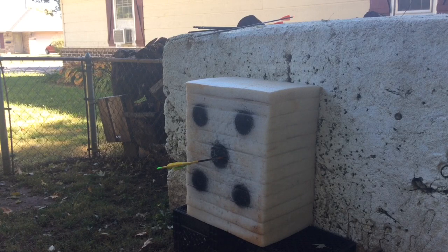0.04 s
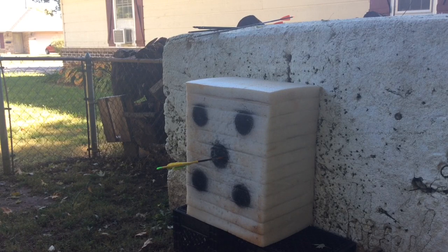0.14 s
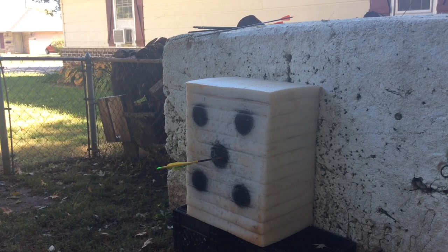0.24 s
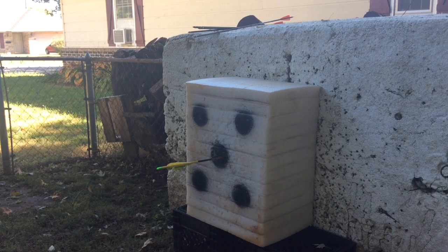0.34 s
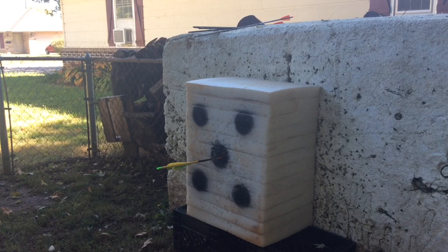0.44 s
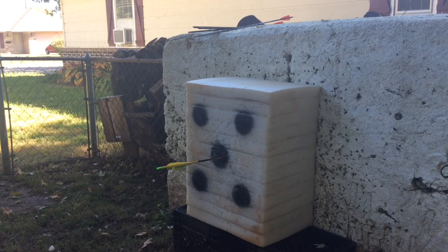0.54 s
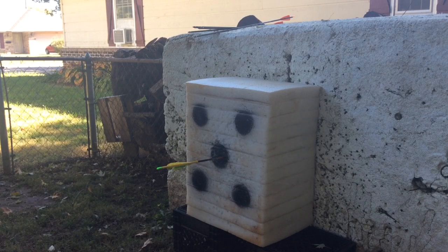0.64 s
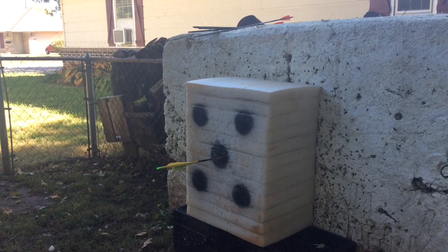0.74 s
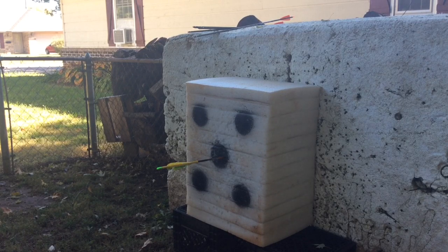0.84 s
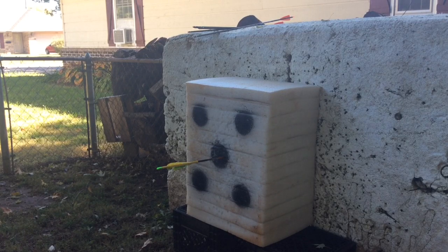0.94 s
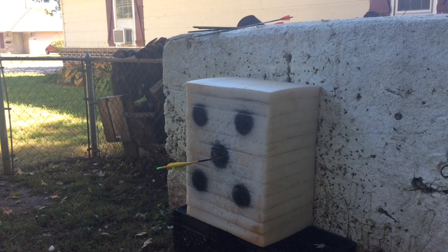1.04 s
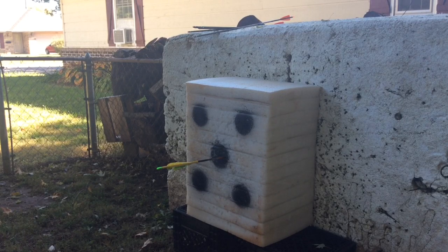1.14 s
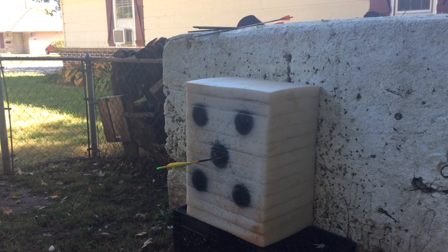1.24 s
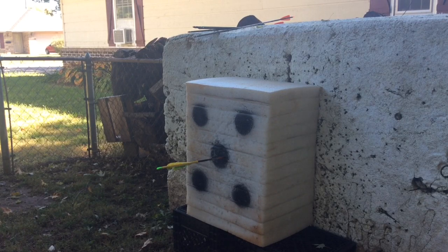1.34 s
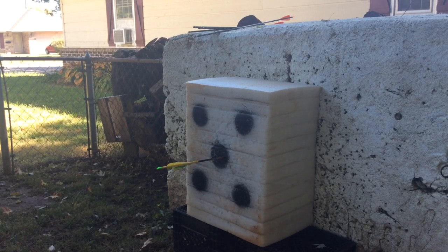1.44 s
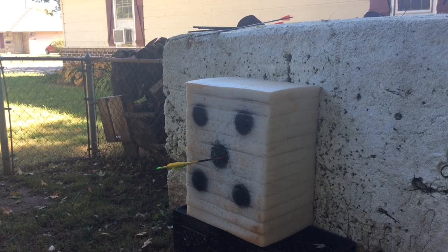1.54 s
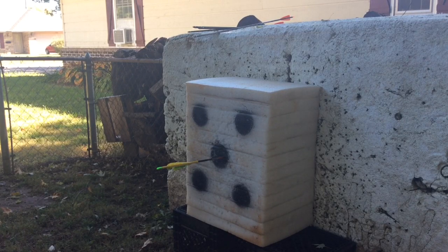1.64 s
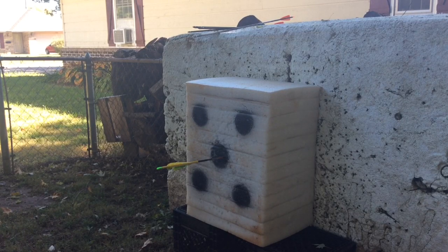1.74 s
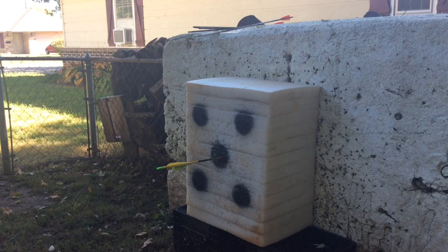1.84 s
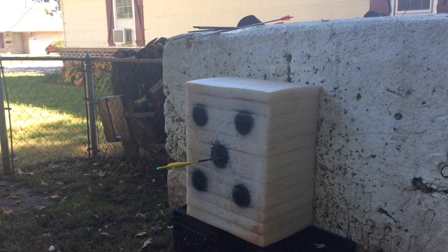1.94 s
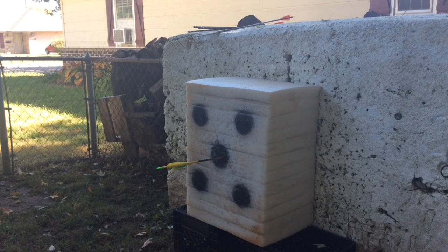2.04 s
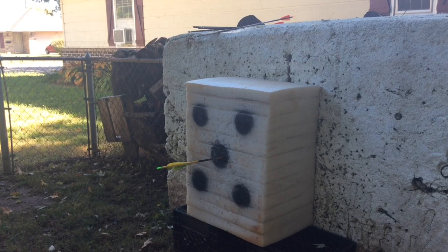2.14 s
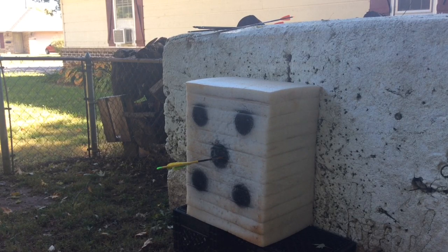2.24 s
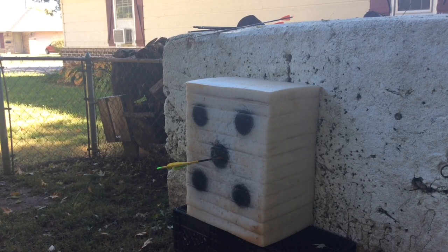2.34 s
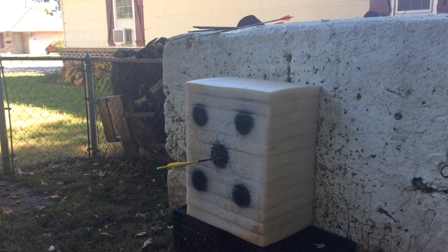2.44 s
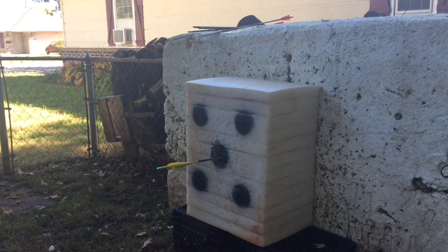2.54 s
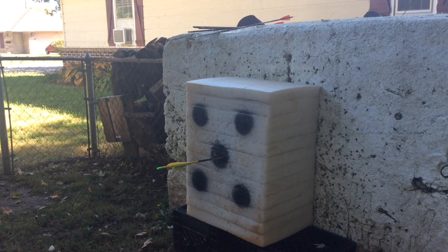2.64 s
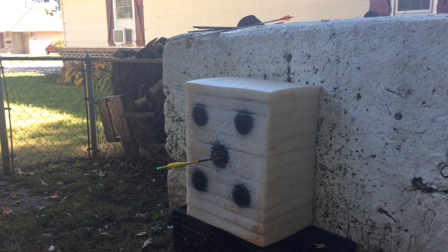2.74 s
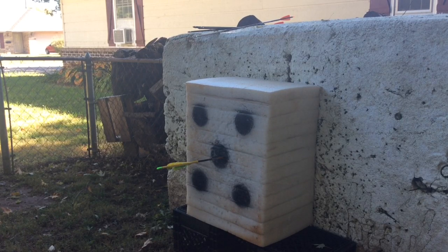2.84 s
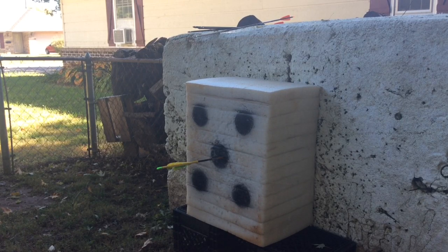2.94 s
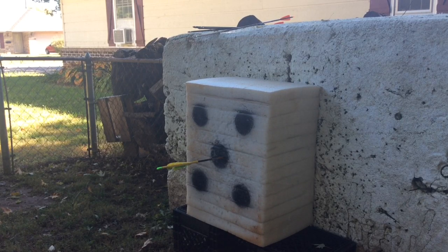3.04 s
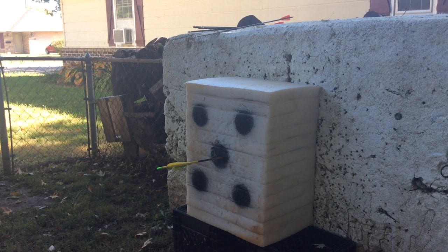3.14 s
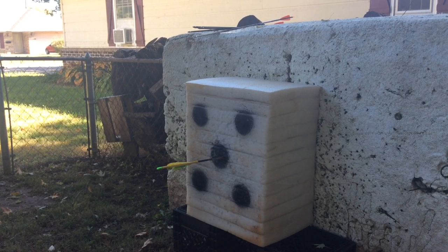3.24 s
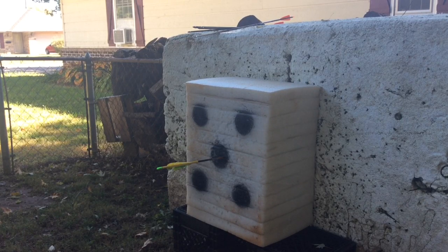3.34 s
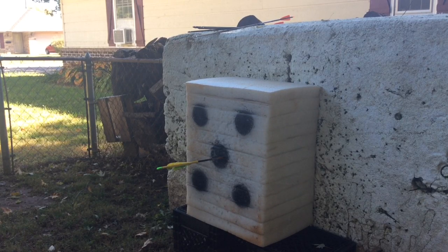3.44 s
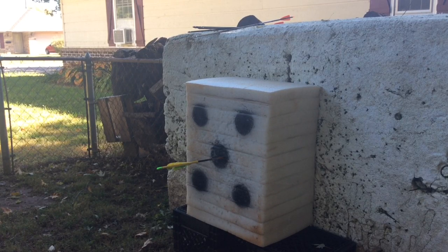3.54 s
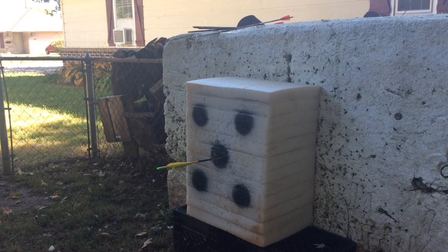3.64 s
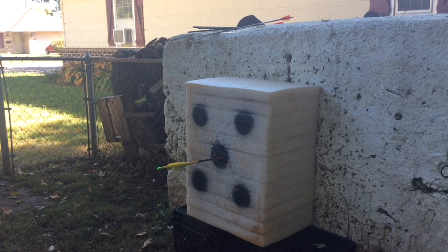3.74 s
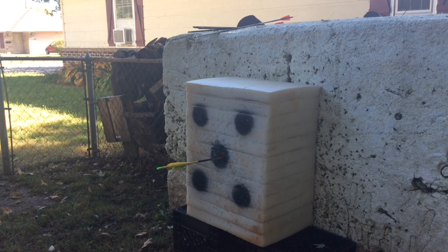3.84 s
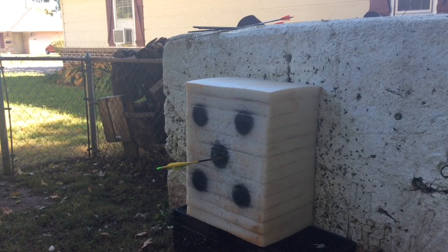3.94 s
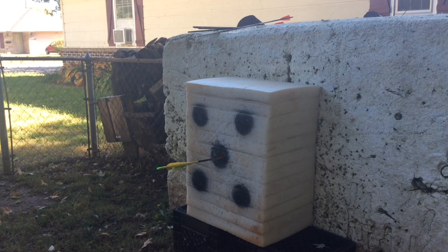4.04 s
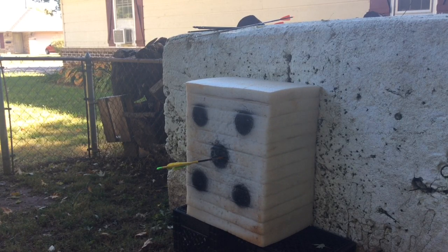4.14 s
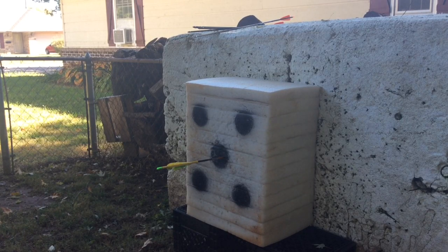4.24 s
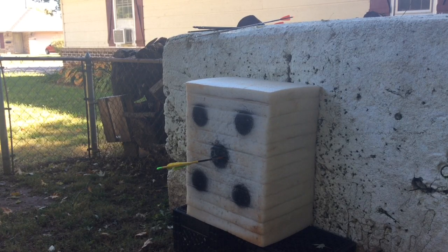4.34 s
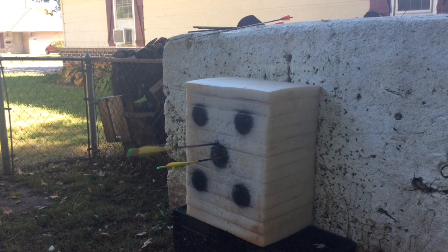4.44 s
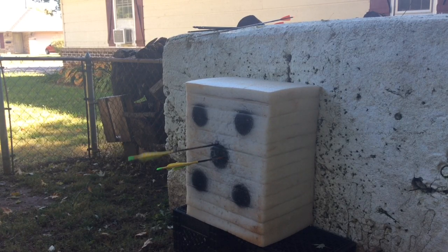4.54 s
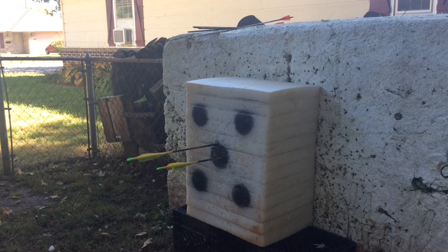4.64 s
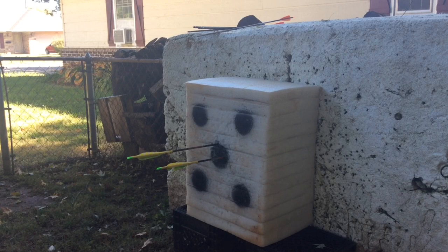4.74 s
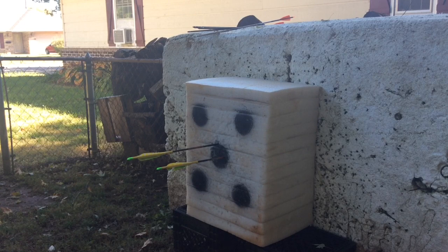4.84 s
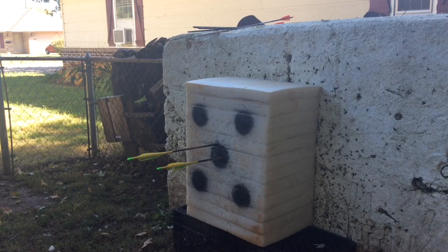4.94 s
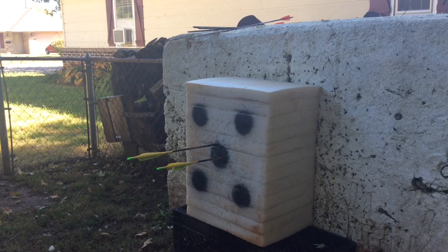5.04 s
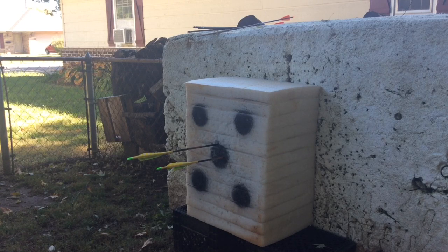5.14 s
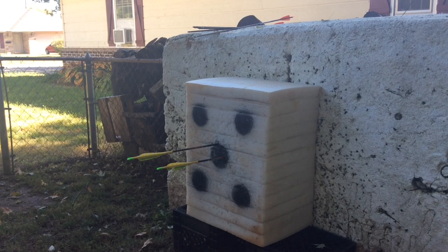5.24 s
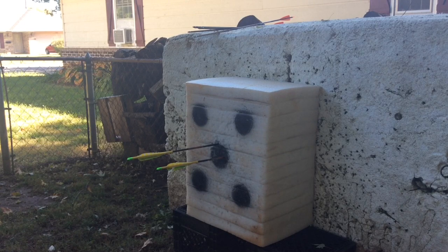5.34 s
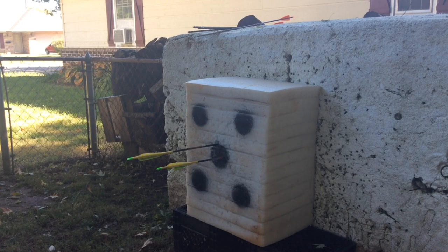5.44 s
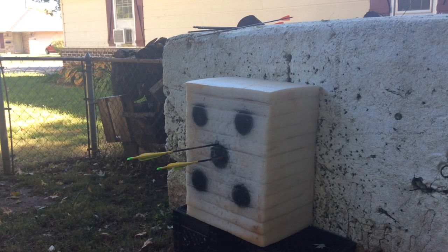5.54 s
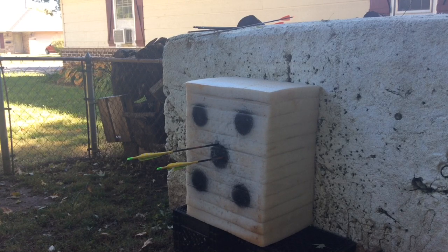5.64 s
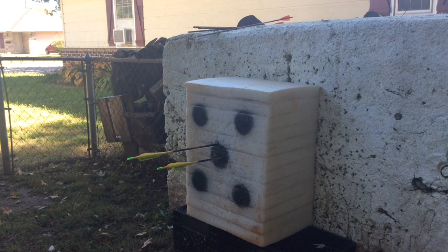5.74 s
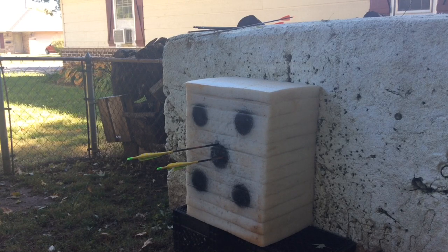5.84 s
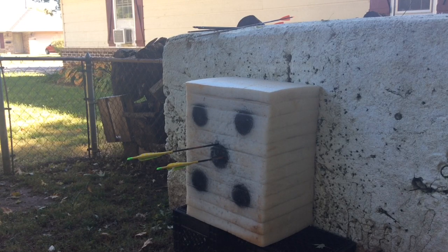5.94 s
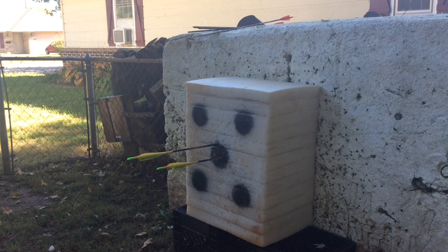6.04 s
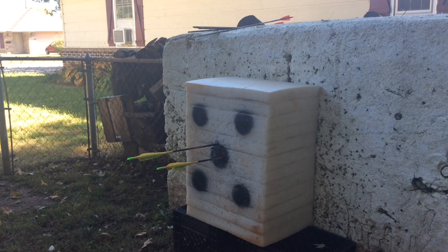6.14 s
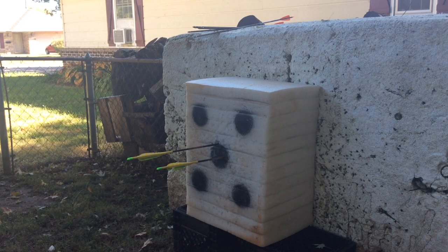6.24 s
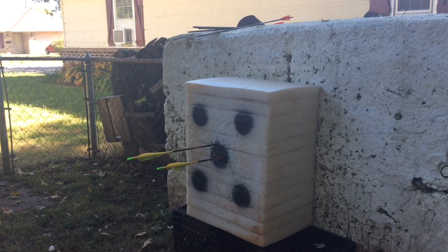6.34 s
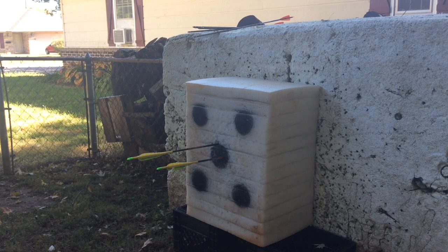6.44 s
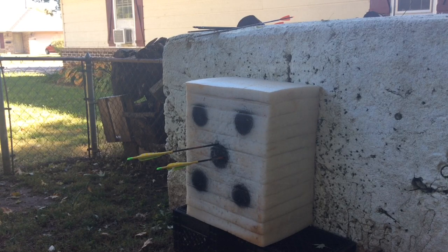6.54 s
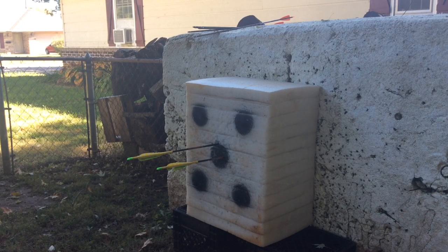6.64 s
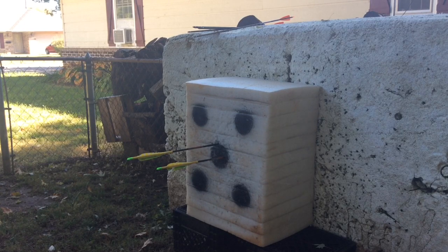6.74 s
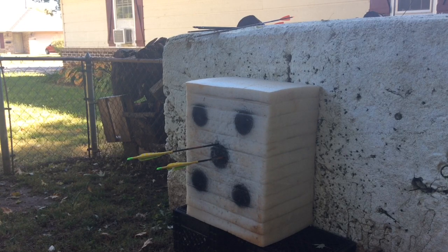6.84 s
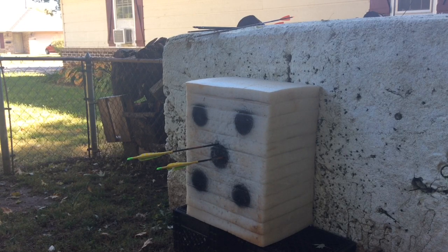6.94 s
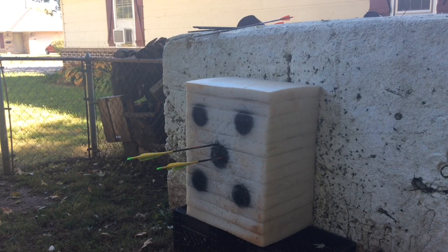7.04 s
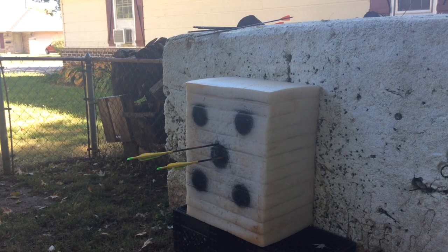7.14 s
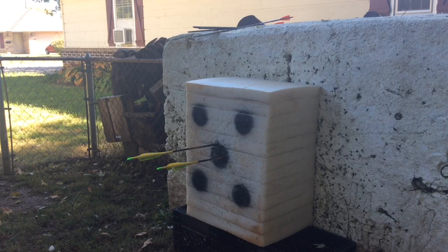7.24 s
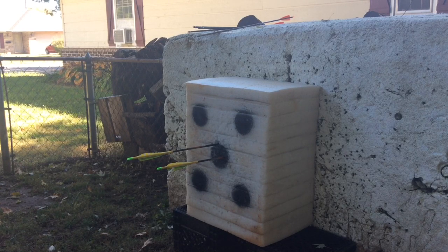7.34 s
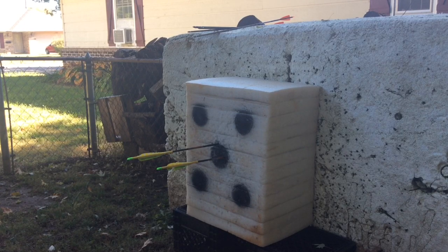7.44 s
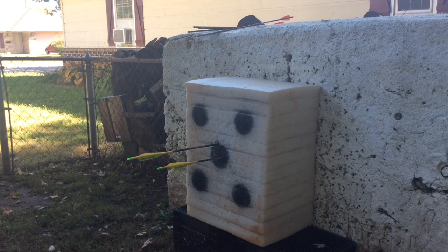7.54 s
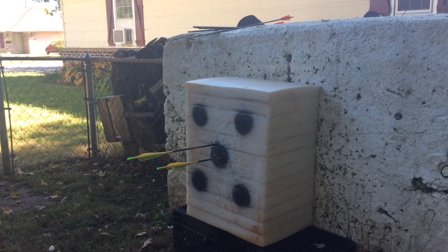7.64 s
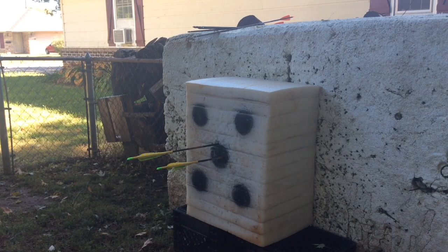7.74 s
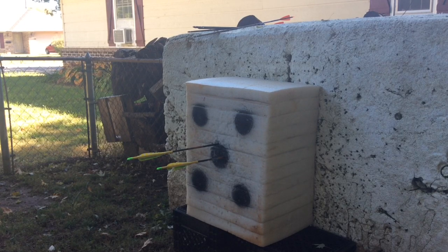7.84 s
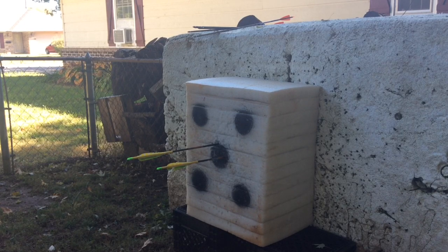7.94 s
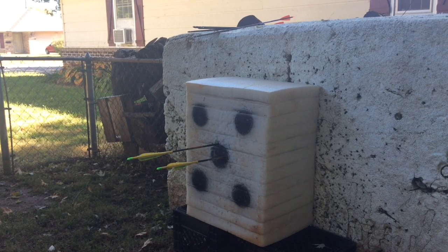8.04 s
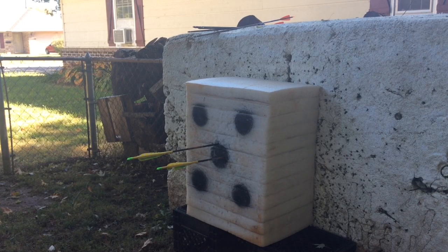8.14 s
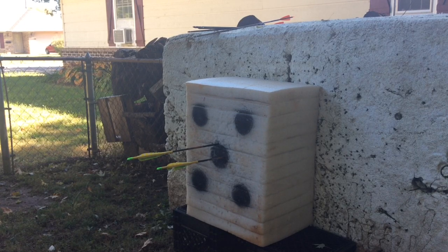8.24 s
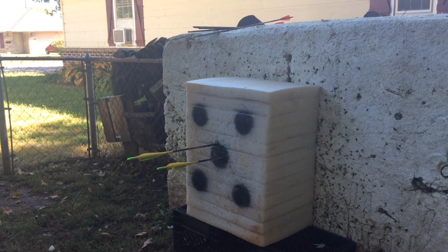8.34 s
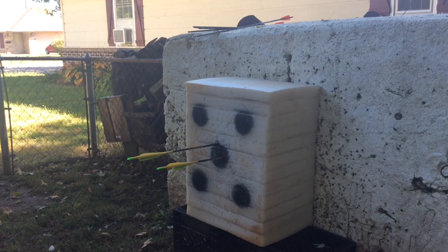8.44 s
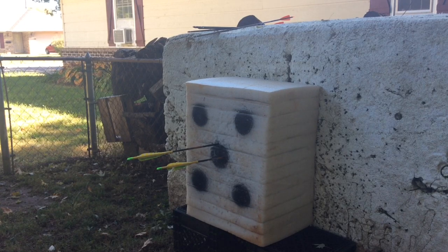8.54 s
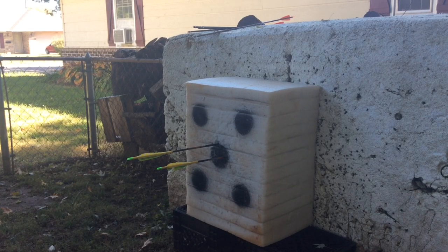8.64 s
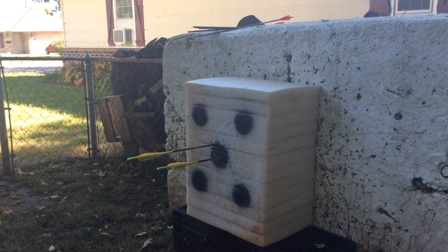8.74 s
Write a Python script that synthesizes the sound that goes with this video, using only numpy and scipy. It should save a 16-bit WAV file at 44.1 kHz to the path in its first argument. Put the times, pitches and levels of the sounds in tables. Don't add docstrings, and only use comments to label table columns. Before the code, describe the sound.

Soft town rumble and thin cricket trills, then a bow's distant snap, a quick hiss and one loud overloaded arrow thwack.

```python
import sys
import numpy as np
from scipy import signal
from scipy.io import wavfile
from scipy.ndimage import uniform_filter1d

SR = 44100
rng = np.random.default_rng(int(sys.argv[2]) if len(sys.argv) > 2 else 0)


def elevation(decibels):
    levels = np.asarray(decibels, float)
    return 10 ** (levels / 20)


def digitize_waveform(pressure):
    field = np.atleast_2d(pressure).T
    bounded = np.clip(field, -1, 1)
    quanta = np.round(bounded * 32767).astype(np.int16)
    wavfile.write(sys.argv[1], SR, quanta)


N = 387633
T = np.arange(N) / SR


def band(x, hz, width_hz, order=1):
    edges = np.clip([hz - width_hz / 2, hz + width_hz / 2], 10, .45 * SR)
    return signal.sosfilt(signal.butter(order, edges, "bandpass", fs=SR, output="sos"), x)


def unit(x):
    return x / np.sqrt(np.mean(x ** 2))


def noise_band(hz, width_hz, order=1):
    return unit(band(rng.standard_normal(N), hz, width_hz, order))


def walk(rate):
    hold = int(SR / rate)
    held = rng.standard_normal(N // 64)[np.arange(N) // hold]
    return 1.3 * uniform_filter1d(uniform_filter1d(held, hold), hold)


def struck(modes, blows):
    t = T[:SR // 2]
    ring = 0
    for k, (hz, db, t60) in enumerate(modes):
        ring = ring + (-1) ** (k + 1) * elevation(db) * np.sin(2 * np.pi * hz * t) * 1000. ** (-t / t60)
    force = np.zeros(N)
    for s, db, contact in blows:
        contact = max(contact, 2 / SR)
        push = np.sin(np.pi * np.clip((T - s) / contact, 0, 1))
        force += elevation(db) * push * np.pi / (2 * contact * SR)
    return signal.fftconvolve(force, ring)[:N]


# mode_hz, level_db, t60_s
SHAFT_MODES = [(613, -17, 0.045), (1040, -6, 0.019), (1290, -14.5, 0.012), (1660, -17, 0.03),
               (2080, -13.5, 0.015), (2720, -10.5, 0.011), (3220, -9.5, 0.0067), (4305, -4.5, 0.013),
               (5700, -8, 0.0043), (7430, -9.5, 0.0079), (8960, -16, 0.011), (11100, -10, 0.0059),
               (14000, -10, 0.0087)]
# mode_hz, level_db, t60_s
FOAM_MODES = [(128.6, -19, 0.163), (160.8, -1.5, 0.17), (216, -2, 0.043), (297, -5, 0.044),
              (428, 4.5, 0.027), (553, -1.5, 0.035), (689, 1.5, 0.036)]
# start_s, level_db, contact_s
TIP_BLOWS = [
    (4.5307, -0.5, 0.000058),
    (4.5328, 4.5, 0.00014),
    (4.544, -1, 0.00024),
]
# start_s, level_db, contact_s
FOAM_BLOWS = [
    (4.5346, 1.54, .0015),
    (4.5385, 1.7, 0.0016),
    (4.5424, 1, 0.00082),
]


def impact():
    return struck(SHAFT_MODES, TIP_BLOWS) + struck(FOAM_MODES, FOAM_BLOWS)


# delay_s, level_db, centre_hz, width_hz
ECHOES = [
    (0.037, -32, 4700, 1300),
    (0.054, -31, 4500, 1000),
    (0.038, -19.5, 240, 80),
    (0.053, -16.5, 153, 110),
    (.17, -23.5, 182, 53),
    (.167, -49, 2000, 1400),
    (0.17, -37.5, 2000, 1300),
    (0.25, -43, 180, 53),
]


def echoes(hit):
    out = np.zeros(N)
    for delay, db, hz, width_hz in ECHOES:
        out += elevation(db) * np.interp(T - delay, T, band(hit, hz, width_hz, order=2))
    return out


# band_hz, start_level_db, t60_s
TAIL = [(59.5, -33, 0.37), (132, -27.5, 0.44), (343, -15, 0.14), (890, -27, 0.092), (2200, -26.5, 0.077),
        (4500, -27.5, 0.093), (9000, -39, 0.12), (13000, -38, 0.089)]


def scattered_tail():
    out = np.zeros(N)
    since = np.clip(T - TIP_BLOWS[0][0], 0, None)
    for hz, db, t60 in TAIL:
        patchy = elevation(db) * elevation(3.5 * walk(150))
        decay = 1000. ** (-since / t60) * (since > 0)
        out += patchy * noise_band(hz, hz * 0.41) * decay
    return out


def thwack():
    hit = impact()
    return hit + echoes(hit) + scattered_tail()


# mode_hz, level_db, t60_s
LIMB_MODES = [(110, -1, 0.15), (136, -10, .12), (170, -11, 0.16), (250, -1.5, 0.0447), (520, -7, 0.038)]
# mode_hz, level_db, t60_s
RISER_MODES = [(2450, -4, 0.057), (2662, 2.5, 0.085), (4150, 5.5, 0.015)]
# start_s, level_db, contact_s
LIMB_BLOWS = [
    (4.392, -20, 0.0032),
    (4.398, -20, 0.0028),
    (4.412, -19.5, 0.0036),
]
# start_s, level_db, contact_s
RISER_BLOWS = [
    (4.383, -52, .0003),
    (4.398, -33, .0001),
    (4.408, -30, .0001),
]


def bow():
    return struck(LIMB_MODES, LIMB_BLOWS) + struck(RISER_MODES, RISER_BLOWS)


def air_noise():
    dull = noise_band(3200, 6200)
    sharp = noise_band(10000, 7100)

    def mix(sharp_share):
        dull_part = np.sqrt(np.clip(1 - sharp_share, 0, 1)) * dull
        return dull_part + np.sqrt(np.clip(sharp_share, 0, 1)) * sharp
    return mix


def string_snap(mix):
    SNAP_S, RISE_S = 4.404, 0.017
    since = T - SNAP_S
    rise = np.clip(1 + since / RISE_S, 0, 1) ** 2

    def swing(fall_s):
        return rise * np.exp(-np.clip(since, 0, None) / fall_s)
    snap = elevation(-28) * swing(0.0086) * mix(0.38)
    ringing_yard = elevation(-39) * swing(0.036) * mix(0.11)
    return snap + ringing_yard


def arrow_flight(mix):
    LEAVES_S, LANDS_S = 4.392, 4.531
    SPEED_M_S, ASIDE_M = 44, 1.3
    FEATHER_DB, HUM_DB = -35, -33
    HUM_HZ, HUM_FADE_S = 432, .3
    ahead_m = SPEED_M_S * np.clip(LANDS_S - T, 0, LANDS_S - LEAVES_S)
    distance_m = np.hypot(ahead_m, ASIDE_M)
    facing = ahead_m / distance_m
    heard_hz = HUM_HZ / (1 - SPEED_M_S * facing / 343)
    phase = 2 * np.pi * np.cumsum(heard_hz * (1 + .01 * walk(90))) / SR
    hum = elevation(-3 + 3.5 * walk(70)) * np.sin(phase)
    hum = hum + elevation(-10 + 4.0 * walk(70)) * np.sin(1.65 * phase)
    hum = elevation(HUM_DB) * hum * np.exp(-np.clip(T - LEAVES_S, 0, 1) / HUM_FADE_S)
    hiss = elevation(FEATHER_DB) * mix(0.32 + .5 * facing)
    flying = (T > LEAVES_S) * (T < LANDS_S) / distance_m
    return flying * (hiss + hum)


def flight():
    mix = air_noise()
    return string_snap(mix) + arrow_flight(mix)


def cricket(trills, strokes, duty, third_db, blur, sag, swell):
    turns = np.cumsum(strokes * (1 + .08 * walk(12))) / SR
    stroke = np.clip(turns % 1 / duty, 0, 1)
    size, detune = rng.standard_normal((1000, 2))[turns.astype(int)].T
    waver = .002 * walk(5) + .003 * detune
    tone = 0
    for start, end, hz, db in trills:
        phase = 2 * np.pi * np.cumsum(hz * (1 + waver + sag * (.5 - stroke))) / SR
        gate = np.clip(np.minimum(T - start, end - T) / max(swell, .005) + .5, 0, 1)
        tone = tone + elevation(db + 2.5) * gate * (np.sin(phase) + elevation(third_db) * np.sin(3 * phase))
    direct = tone * elevation(2.4 * size) * elevation(1.0 * walk(9)) * np.sin(np.pi * stroke) ** .7
    scatter = rng.standard_normal(SR // 8) * np.exp(-T[:SR // 8] / 0.013)
    smeared = signal.fftconvolve(direct, scatter)[:N]
    return direct + blur * unit(smeared) * np.std(direct)


# start_s, end_s, pitch_hz, level_db
NEAR_TRILLS = [
    (.05, .62, 3875, -57.5),
    (1.07, 1.5, 3905, -56),
    (2.1, 2.55, 3875, -55.5),
    (3.25, 3.65, 3910, -56),
    (4.82, 5.27, 3910, -57),
    (7.0, 7.43, 3900, -55.5),
    (8.65, 8.9, 3900, -58),
]


def near_cricket():
    return cricket(NEAR_TRILLS, strokes=40, duty=.58, third_db=-23, blur=1.1, sag=.022, swell=.05)


# start_s, end_s, pitch_hz, level_db
FAR_TRILLS = [(-.05, .48, 4160, -59), (.87, 1.36, 4160, -63), (1.66, 2.02, 4155, -61),
              (2.07, 2.46, 4160, -63), (2.87, 3.5, 4150, -62), (3.75, 4.2, 4140, -59),
              (4.74, 5.3, 4150, -62), (5.74, 6.1, 4165, -57), (6.68, 7.08, 4170, -61),
              (7.17, 7.43, 4190, -64), (7.58, 8.27, 4165, -60), (8.62, 8.9, 4200, -61)]


def far_cricket():
    return cricket(FAR_TRILLS, strokes=45, duty=0.67, third_db=-31, blur=2.62, sag=0.022, swell=0.19)


# centre_hz, width_hz, level_db
CHORUS = (4120, 530, -66)


def cricket_chorus():
    hz, width_hz, db = CHORUS
    return elevation(db + 0.66 * walk(3.49)) * noise_band(hz, width_hz)


# peak_s, level_db, rise_s, fall_s, base_hz (band spans 0.7 to 2.3 times this)
RUSTLES = [
    (.797, -51, .006, .02, 4200),
    (.797, -45.5, .006, .014, 1600),
    (.808, -50, .006, .012, 900),
    (5.5, -58, .02, .02, 3000),
    (5.555, -57, .025, .05, 5500),
]


def leaf_rustles():
    out = 0
    for s, db, rise, fall, hz in RUSTLES:
        shape = np.exp(-np.abs(T - s) / np.where(T < s, rise, fall))
        grains = rng.standard_normal(N) * elevation(3.0 * walk(400))
        out = out + elevation(db) * shape * unit(band(grains, hz * 1.5, hz * 1.6, order=2))
    return out


# centre_s, pitch_hz, level_db, length_s
FAR_TONES = [(.26, 196, -46, .15), (.9, 90, -49, .3), (1.35, 152, -50, .35), (2.0, 222, -52, .25),
             (3.59, 670, -54, .035), (5.45, 96, -48, .15), (5.72, 245, -54, .12), (6.7, 245, -53, .15),
             (7.135, 2300, -63, .025), (7.225, 2150, -60, .015), (7.4, 147, -47, .25), (8.0, 152, -47, .35),
             (8.74, 200, -49, .08)]


def far_engines_and_birds():
    out = 0
    waver = T + np.cumsum(.012 * walk(8)) / SR
    for s, hz, db, length in FAR_TONES:
        swell = elevation(db + 2.0 * walk(7.3)) * np.exp(-2 * ((T - s) / length) ** 2)
        out = out + swell * np.sin(2 * np.pi * hz * waver)
    return out


# band_hz, level_db (per Hz)
YARD_SPECTRUM = [(12, -63), (20, -50), (43, -9.5), (142, -1), (182, -8), (210, -11.5), (301, -13),
                 (499, -21), (678, -23), (759, -20), (1860, -31), (2600, -30), (5680, -33), (14700, -40),
                 (16000, -51)]


def yard():
    YARD_DB = -46
    BREEZE_DB_PER_S, TRAFFIC_DB_PER_S = -0.42, -0.03
    TRAFFIC_SWELL_DB, TRAFFIC_SWELLS_PER_S = 0.8, 1.53
    LEAVES_FROM_HZ, LEAVES_FULL_HZ = 860, 9000
    grid_hz, grid_db = np.transpose(YARD_SPECTRUM)
    from_middle_s = T - T.mean()
    breeze_db = BREEZE_DB_PER_S * from_middle_s
    traffic_db = TRAFFIC_SWELL_DB * walk(TRAFFIC_SWELLS_PER_S) + TRAFFIC_DB_PER_S * from_middle_s
    out = 0
    for hz in 25 * 2 ** np.arange(0, 9.4, 1 / 3):
        leafy = np.interp(np.log(hz), np.log([LEAVES_FROM_HZ, LEAVES_FULL_HZ]), [0, 1])
        db = np.interp(np.log(hz), np.log(grid_hz), grid_db) + 10 * np.log10(hz)
        flicker_db = np.interp(np.log(hz), np.log([100, 4000]), [2.0, .5])
        db = db + leafy * breeze_db + flicker_db * (walk(4) + traffic_db / 2)
        out = out + elevation(db) * noise_band(hz, hz / 4, order=2)
    return elevation(YARD_DB) * unit(out)


def scene():
    crickets = near_cricket() + far_cricket() + cricket_chorus()
    background = yard() + leaf_rustles() + far_engines_and_birds()
    shot = bow() + flight() + thwack()
    return (crickets + background + shot)[None]


def low_pass(x):
    return signal.sosfilt(signal.butter(12, 15800, fs=SR, output="sos"), x)


def record(dry):
    heard = signal.sosfilt(signal.butter(2, 38, "highpass", fs=SR, output="sos"), dry)
    heard = signal.sosfilt(signal.ellip(8, .2, 60, 15800, fs=SR, output="sos"), heard)
    return low_pass(np.clip(heard, -1, 1))


dry = scene()
out = record(dry)
digitize_waveform(out)
```